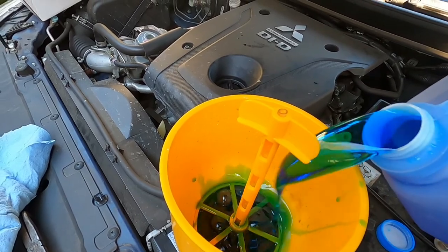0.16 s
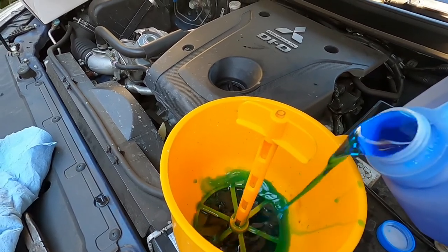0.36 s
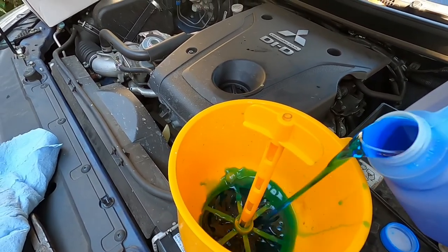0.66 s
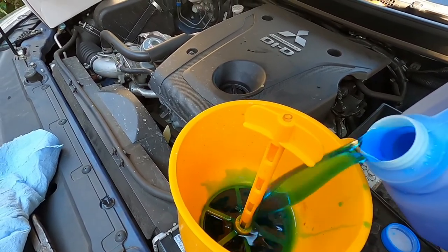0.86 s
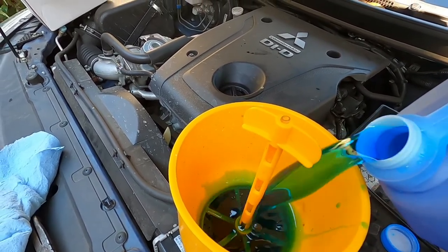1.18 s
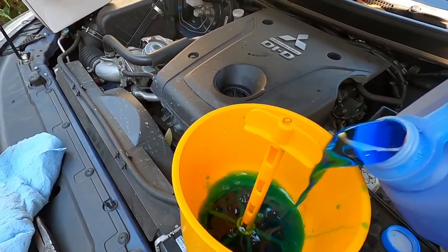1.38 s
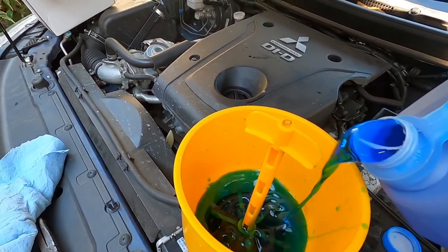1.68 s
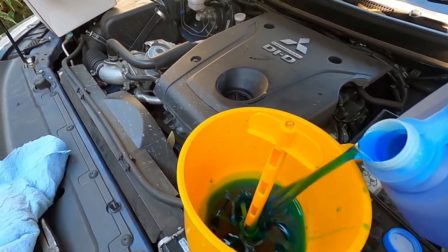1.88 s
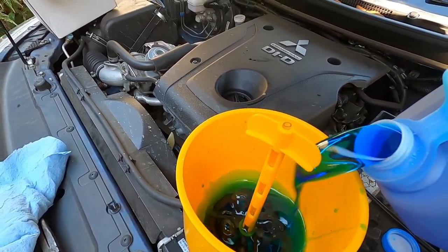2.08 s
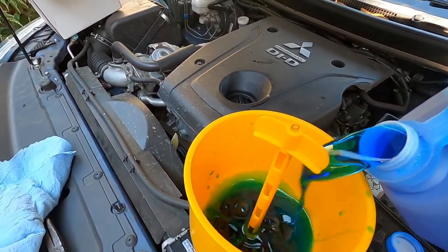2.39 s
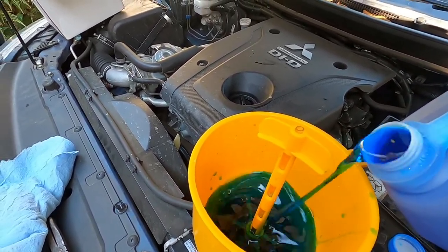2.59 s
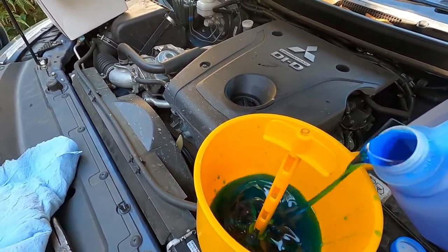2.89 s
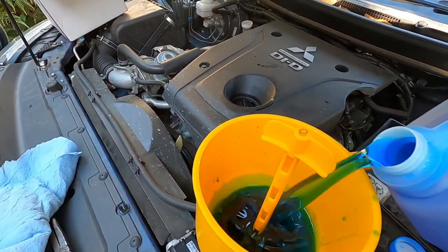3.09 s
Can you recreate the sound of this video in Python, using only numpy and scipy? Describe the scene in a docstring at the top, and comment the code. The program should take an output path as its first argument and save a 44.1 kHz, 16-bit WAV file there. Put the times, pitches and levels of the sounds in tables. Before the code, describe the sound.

Coolant glugs from a plastic jug into a part-filled funnel in quick, bubbly surges.

```python
"""Coolant glugs from a plastic jug into a part-filled plastic funnel, about three surges a second.
Each surge splashes as swarms of tiny bubbles and a noise wash; larger trapped bubbles ring with moving pitch.
Bursts crack and spray, and large air pockets plop and climb in pitch; the funnel's hollow colours all of these.
A low rumble, ticking droplets and echoes join them, over a faint hiss and a thin steady whine."""
import sys
import numpy as np
from scipy import signal
from scipy.fft import rfft, irfft, next_fast_len
from scipy.io import wavfile

SR = 44100
rng = np.random.default_rng(int(sys.argv[2]) if len(sys.argv) > 2 else 0)


def pcm_store(signal):
    """Save signal as 16-bit PCM."""
    levels = np.round(np.clip(np.atleast_2d(signal), -1, 1) * 32767)
    wavfile.write(sys.argv[1], SR, levels.astype(np.int16).T)


N = 143325
TIME = np.arange(N) / SR


def from_db(db):
    """Turn decibels into an amplitude factor."""
    return 10 ** (np.asarray(db) / 20)


def rms_one(x):
    """Scale a sound to unit average power."""
    return x / np.sqrt(np.mean(x ** 2) + 1e-20)


def at_hz(points, hz, axis=1):
    """Read a table column between its points, along a logarithmic pitch axis."""
    points = np.array(points)
    return np.interp(np.log(np.maximum(hz, 1)), np.log(points[:, 0]), points[:, axis])


def coloured(x, spectrum):
    """Make some pitches of a sound stronger and others weaker, along a smooth curve."""
    size = next_fast_len(x.shape[-1])
    gain = from_db(at_hz(spectrum, np.fft.rfftfreq(size, 1 / SR)))
    return irfft(rfft(x, size) * gain, size)[..., :x.shape[-1]]


def noise(spectrum):
    """Make coloured noise of unit power."""
    return rms_one(coloured(rng.standard_normal(N), spectrum))


def add(track, s, sound):
    """Mix a sound into a track at a time in seconds."""
    start = int(np.clip(s * SR, 0, N - 1))
    track[start:start + len(sound)] += sound[:N - start]


# Faint air noise behind the pour: (frequency [Hz], relative level [dB per Hz])
AIR = [(25, 8), (110, 9), (310, -2), (540, -11), (800, -11), (1450, -4), (2900, -8), (4200, -10.5),
       (7600, -18.5), (9500, -35), (13000, -35), (16000, -63)]
AIR_DB, AIR_SIDE_DB = -56, -3.5   # side: the part with opposite sign left and right, relative to the rest
WHINE_HZ, WHINE_DB = 5095, -61.5


def background():
    """Quiet outdoor air is coloured stereo noise; the thin whine is one steady sine."""
    side = from_db(AIR_SIDE_DB) * noise(AIR) * np.array([[1], [-1]])
    air = noise(AIR) + side
    whine = np.sin(2 * np.pi * WHINE_HZ * TIME)
    return from_db(AIR_DB) * air + from_db(WHINE_DB) * whine


# Surges hitting the pool:
# (peak time [s], splash level [dB], rise scale [s], fall scale [s], rumble level [dB])
SURGES = [(0.136, -29.5, 0.029, 0.042, -41), (0.451, -31, 0.043, 0.052, -42),
          (0.785, -31, 0.053, 0.041, -43), (1.101, -37, 0.052, 0.065, -40),
          (1.457, -34, 0.057, 0.043, -38.5), (1.767, -30, 0.043, 0.032, -39),
          (2.107, -36, 0.053, 0.042, -45.5), (2.469, -33, 0.066, 0.024, -47),
          (2.726, -40.5, 0.065, 0.073, -53.5), (3.057, -28, 0.016, 0.022, -45.5)]
TRICKLE_DB = -59.5   # the thin stream between surges
GLUG_SPLASH_DB, GLUG_SPLASH_S = -12, 0.0095   # small bubbles shed as a pocket surfaces


def flow():
    """The splash strength adds a steady trickle, the surges and a burst from each surfacing air pocket."""
    strength = from_db(TRICKLE_DB)
    for s, db, rise, fall, _ in SURGES:
        distance = np.abs((TIME - s) / np.where(TIME < s, rise, fall))
        strength = strength + from_db(db) * np.exp(-distance ** 1.71 / 1.17)
    for s, _, _, _, db, swell in GLUGS:
        shed = np.exp(-np.abs(TIME - s - swell) / GLUG_SPLASH_S)
        strength = strength + from_db(db + GLUG_SPLASH_DB) * shed
    return strength


BUBBLE_ONSET = 0.47   # share of full strength at the moment of trapping
BUBBLE_FADE = 1.35   # above 1, the fade starts gently and then steepens


def bubble(hz, rise, swell, decay):
    """Trapped air rings with gliding pitch (octaves/s), swells, then dies; a far climb weakens it too."""
    t = np.arange(int((swell + 6 * decay) * SR) + 2) / SR
    pitch = hz * 2 ** np.minimum(rise * t, 4)   # at most four octaves up
    growing = BUBBLE_ONSET + (1 - BUBBLE_ONSET) * t / swell
    dying = np.exp(-(np.maximum(t - swell, 0) / decay) ** BUBBLE_FADE)
    level = np.where(t < swell, growing, dying)
    surfacing = 1 / (1 + (pitch / min(hz * 4, hz + 2600)) ** 6)
    return level * surfacing * np.sin(2 * np.pi * np.cumsum(pitch) / SR)


# Strength of the tiny bubbles by pitch: (starting pitch [Hz], relative level [dB])
FIZZ = [(300, -16.5), (500, 0), (900, -6.5), (1500, 8.5), (3000, 5.5), (4500, 4.5), (7000, 1), (9500, -6),
        (14000, -6)]
FIZZ_PER_S, FIZZ_DB, FIZZ_SPREAD_DB = 1800, -3, 2.4   # spread: unevenness of bubble strength
FIZZ_CYCLES, FIZZ_RISE = 6, 0.16   # sets the decay; rise in octaves per decay time
# Smooth part of the splash: (frequency [Hz], relative level [dB per Hz])
WASH = [(100, 9), (300, 0.5), (1000, 5), (3000, -5.5), (6000, -9), (9000, -19.5), (16000, -34)]
WASH_DB = -16


def splash():
    """Swarms of tiny ringing bubbles and a smooth noise wash swell with the flow."""
    fizz = np.zeros(N)
    for when, pitch, size, sign in rng.random((int(FIZZ_PER_S * N / SR), 4)):
        hz = 350 * 40 ** (pitch ** 0.7)
        decay = FIZZ_CYCLES / (hz + 1500)
        db = at_hz(FIZZ, hz) + FIZZ_SPREAD_DB * min(-np.log(1 - size), 3.5)
        ring = bubble(hz, FIZZ_RISE / decay, 1 / hz, decay)
        add(fizz, when * N / SR, np.sign(sign - 0.5) * from_db(db) * ring)
    return flow() * (from_db(FIZZ_DB) * rms_one(fizz) + from_db(WASH_DB) * noise(WASH))


BURBLE_PER_S, BURBLE_HZ, BURBLE_DB, BURBLE_DECAY_S = 120, 561, -15, 0.0047
BURBLE_LINGER_S = 0.025   # how slowly the churning follows the flow


def burble():
    """Mid-sized churned bubbles ring near the funnel's lowest resonance and outlast each surge a little."""
    out = np.zeros(N)
    for when, pitch, size in rng.random((int(BURBLE_PER_S * N / SR), 3)):
        hz = BURBLE_HZ * 2 ** (pitch - 0.5)
        add(out, when * N / SR, size * bubble(hz, 12.5, 1 / BURBLE_HZ, BURBLE_DECAY_S))
    keep = np.exp(-1 / (BURBLE_LINGER_S * SR))
    churning = signal.lfilter([1 - keep], [1, -keep], flow())
    return from_db(BURBLE_DB) * rms_one(out) * churning


# Low shaking of the funnel: (frequency [Hz], relative level [dB per Hz])
RUMBLE = [(20, -14), (60, -6), (86, 7), (100, -3), (125, -4), (165, -14), (300, -19), (700, -60)]
RUMBLE_LAG_S, RUMBLE_WIDTH_S = 0.018, 0.037


def rumble():
    """The weight of each surge shakes the funnel: low noise swells just after the splash peak."""
    strength = np.zeros(N)
    for s, _, _, _, db in SURGES:
        distance = (TIME - s - RUMBLE_LAG_S) / RUMBLE_WIDTH_S
        strength += from_db(db) * np.exp(-0.5 * distance ** 2)
    return noise(RUMBLE) * strength


SPAT_DECAY_S = 0.0009


def spat(hz):
    """A drop ticks on plastic: a dying noise burst through a resonance, its grain differing left and right."""
    t = TIME[:SR // 100]
    burst = rng.standard_normal((2, len(t))) * np.exp(-t / SPAT_DECAY_S)
    tick = signal.lfilter(*signal.iirpeak(hz, 2, fs=SR), burst)
    return tick / np.abs(tick).max()


# Strong drops that hit the bare plastic: (time [s], pitch [Hz], level [dB])
SPATS = [(0.078, 10000, -35), (0.324, 11000, -35), (0.467, 12500, -35), (0.782, 12500, -33),
         (0.881, 9000, -31), (1.33, 11000, -36), (2.718, 13000, -33)]
MIST_PER_S, MIST_DB, MIST_SPREAD_DB = 130, -57, 8   # spread: unevenness of droplet strength
MIST_FOLLOWS = 1.05   # power of the flow that shapes the fine droplets


def mist():
    """Droplets tick on the funnel wall: many uneven fine ones follow the flow, plus a few strong ones."""
    fine, strong = np.zeros((2, N)), np.zeros((2, N))
    for when, pitch, size in rng.random((int(MIST_PER_S * N / SR), 3)):
        level = from_db(MIST_SPREAD_DB * min(-np.log(1 - size), 3))
        for channel, sound in zip(fine, spat(4500 * 2.8 ** pitch)):
            add(channel, when * N / SR, level * sound)
    for s, hz, db in SPATS:
        for channel, sound in zip(strong, spat(hz)):
            add(channel, s, from_db(db) * sound)
    return from_db(MIST_DB) * rms_one(fine * flow() ** MIST_FOLLOWS) + strong


WOBBLE_DB, WOBBLE_HZ = 3, 96   # typical swing in strength; upper limit of its speed


def wobble():
    """Large bubbles deform restlessly; slow noise of unit power stands for this."""
    slow = signal.butter(2, WOBBLE_HZ, fs=SR, output="sos")
    return rms_one(signal.sosfilt(slow, rng.standard_normal(N)))


# Distinct trapped air bubbles: (time [s], starting pitch [Hz], rise [octaves/s],
# relative level [dB], swell [s], decay [s])
BUBBLES = [(0.0159, 286, 13, -24, 0.0001, 0.0035), (0.0365, 2080, 81, -35.5, 0.011, 0.00094),
           (0.052, 2920, 59, -30, 0.0032, 0.0045), (0.0528, 2207, -20, -26.5, 0.0045, 0.0011),
           (0.0665, 2000, 92, -26, 0.006, 0.0022), (0.0815, 1358, 4.5, -31.5, 0.00057, 0.018),
           (0.1184, 428, 7.5, -15, 0.00073, 0.01), (0.1181, 2020, 18, -29, 0.0012, 0.0027),
           (0.1724, 2290, 5, -26, 0.0017, 0.002), (0.217, 489, 45.5, -29, 0.0019, 0.027),
           (0.246, 1970, 31, -20.5, 0.00073, 0.00051), (0.3188, 3100, 33, -40.5, 0.0012, 0.0019),
           (0.3795, 3150, 6, -34.5, 0.0023, 0.00081), (0.3945, 2630, 127, -24.5, 0.0036, 0.0011),
           (0.4082, 1470, 13, -25.5, 0.00082, 0.0032), (0.495, 552, 6, -35.5, 0.00071, 0.01),
           (0.523, 3160, 45, -27, 0.0019, 0.00042), (0.5758, 1990, 72, -29.5, 0.00079, 0.00062),
           (0.5816, 3320, 110, -21.5, 0.00074, 0.00017), (0.5942, 2130, 62, -42, 0.0025, 0.0084),
           (0.6775, 1275, 15, -39.5, 0.00052, 0.068), (0.6926, 637, -3, -35.5, 0.0075, 0.0031),
           (0.693, 3170, 107, -29, 0.001, 0.0045), (0.7064, 2880, 69, -32.5, 0.0026, 0.0065),
           (0.795, 518, 5, -36, 0.0024, 0.01), (0.7946, 1480, 24, -30.5, 0.0017, 0.0033),
           (0.803, 2174, 81, -22, 0.0049, 0.00056), (0.8195, 480, -2, -31.5, 0.0025, 0.0055),
           (0.9859, 1215, 91.5, -43.5, 0.0011, 0.011), (1.0573, 1983, 28, -33, 0.00028, 0.055),
           (1.0694, 2420, 51, -20.5, 0.0026, 0.0017), (1.0809, 3380, 22, -25.5, 0.004, 0.0004),
           (1.1036, 1250, 87, -30.5, 0.0016, 0.0035), (1.103, 202, 11.5, -32, 0.0074, 0.026),
           (1.129, 590, -2, -35, 0.0078, 0.0052), (1.174, 584, 16, -19.5, 0.00065, 0.0015),
           (1.181, 515, 26.5, -29, 0.0094, 0.0081), (1.3099, 2410, 45, -50.5, 0.0012, 0.0096),
           (1.3704, 2640, 27, -37.5, 0.005, 0.0014), (1.3933, 2400, 107, -23, 0.00021, 0.0007),
           (1.4265, 1980, 81, -24.5, 0.00051, 0.0042), (1.481, 518, 5, -40.5, 0.002, 0.012),
           (1.5336, 2950, 21, -31, 0.0019, 0.00067), (1.654, 1092, 68.5, -28, 0.0224, 0.0006),
           (1.6527, 1980, 71, -33.5, 0.0013, 0.009), (1.6896, 1040, -9, -34, 0.0021, 0.0071),
           (1.756, 322, 2.5, -19.5, 0.0012, 0.013), (1.7575, 674, 10, -17, 0.00079, 0.0022),
           (1.758, 990, 6, -24.5, 0.0013, 0.0055), (1.7791, 2450, 40, -21, 0.0012, 0.0025),
           (1.803, 396, 38, -37.5, 0.01, 0.0059), (1.83, 477, 6, -39.5, 0.0042, 0.004),
           (1.981, 1680, 74, -54, 0.014, 0.0072), (2.0108, 2338, 70.5, -26.5, 0.00036, 0.01),
           (2.018, 2190, 77, -28, 0.0005, 0.0052), (2.022, 1720, 8, -20, 0.0011, 0.0011),
           (2.052, 1185, 17, -28.5, 0.00056, 0.0095), (2.075, 2977, 16, -34.5, 0.0012, 0.011),
           (2.1222, 512, 21, -38, 0.0018, 0.034), (2.155, 1900, 40, -29, 0.001, 0.008),
           (2.3178, 1060, 12, -24.5, 0.00013, 0.0063), (2.352, 1736, 28, -22, 0.00032, 0.0037),
           (2.453, 2450, 64, -24.5, 0.0026, 0.00036), (2.461, 608, 11.5, -26.5, 0.00072, 0.0088),
           (2.467, 1514, -2, -25, 0.00027, 0.005), (2.4783, 2370, 11, -23.5, 0.0024, 0.0012),
           (2.674, 2000, 30, -30, 0.00077, 0.009), (2.743, 636, 10, -29, 0.0025, 0.012),
           (2.7665, 2620, 211, -33, 0.0013, 0.00087), (2.8017, 1247, 66.5, -32, 0.0053, 0.013),
           (2.856, 613, 33, -27, 0.0017, 0.0027), (2.933, 595, 2, -23.5, 0.0097, 0.0049),
           (2.9324, 1185, 29.5, -31, 0.0051, 0.0044), (3.0008, 2070, 2, -20, 0.0029, 0.0011),
           (3.0393, 1667, -14, -22.5, 0.0022, 0.0029), (3.0496, 560, 12, -15, 0.0017, 0.00042),
           (3.0561, 2980, 85, -26.5, 0.0014, 0.0065), (3.0599, 1570, -2, -24, 0.0027, 0.0032),
           (3.067, 622, -4.5, -30, 0.0012, 0.011), (3.071, 2346, 123.5, -25.5, 0.0065, 0.00046),
           (3.1078, 1716, 28, -25.5, 0.0017, 0.0091), (3.119, 560, 37, -41, 0.005, 0.022),
           (3.2225, 2180, 5, -27.5, 0.00044, 0.0022)]
BUBBLE_DB = 1.5   # added to every level


def gurgles():
    """Distinct bubbles ring with gliding pitch and waver in strength as they deform."""
    out = np.zeros(N)
    for s, hz, rise, db, swell, decay in BUBBLES:
        add(out, s, from_db(db + BUBBLE_DB) * bubble(hz, rise, swell, decay))
    return out * from_db(WOBBLE_DB * wobble())


# Bubbles bursting and drops slapping: (time [s], relative spray level [dB], relative body level [dB])
POPS = [(0.0549, -28.5, -28), (0.078, -28, -20.5), (0.1343, -40, -20.5), (0.2132, -21.5, -23.5),
        (0.3241, -50, -35), (0.392, -27, -27.5), (0.409, -19, -24.5), (0.4543, -23, -48),
        (0.4824, -26.5, -51), (0.5626, -28, -28), (0.6938, -30.5, -29), (0.8663, -22.5, -29.5),
        (1.0224, -35.5, -57), (1.0807, -27, -52), (1.1323, -23, -58), (1.167, -32, -36),
        (1.1907, -26.5, -31.5), (1.33, -34, -45.5), (1.398, -21.5, -50), (1.424, -26.5, -46),
        (1.4605, -27.5, -29), (1.5314, -22.5, -37.5), (1.691, -29.5, -32), (1.742, -29.5, -22),
        (1.7798, -16.5, -24.5), (1.829, -29.5, -26), (2.0139, -18, -34), (2.0704, -20.5, -27.5),
        (2.1592, -20, -25.5), (2.3185, -64, -25.5), (2.4039, -36.5, -39), (2.432, -21.5, -45),
        (2.4947, -26, -32), (2.6749, -36, -43), (2.7104, -23, -59), (2.798, -21.5, -22),
        (2.9713, -36, -24.5), (3.042, -26.5, -23), (3.0597, -23, -22), (3.111, -23.5, -28),
        (3.219, -37.5, -37)]
POP_BODY_DB, POP_SPRAY_DB = -2, -4.5   # added to every level
POP_SCALE_S = 0.0018   # sets the length of each crack


def pops():
    """Each burst is a brief, grainy noise crack, split into a dull body and a bright spray."""
    out, t = np.zeros(N), TIME[:SR // 40]
    body = signal.butter(2, [300, 2550], "band", fs=SR, output="sos")
    spray = signal.butter(2, [3800, 6980], "band", fs=SR, output="sos")
    for s, spray_db, body_db in POPS:
        grain = rng.standard_normal((2, len(t))) ** 3   # cubing makes a few grains stand out
        crack = grain * t * np.exp(-1.6 * t / POP_SCALE_S)
        levels = (body_db + POP_BODY_DB, spray_db + POP_SPRAY_DB)
        for band, burst, db in zip((body, spray), crack, levels):
            sound = signal.sosfilt(band, burst)
            strength = np.sqrt(np.sum(sound ** 2) / (POP_SCALE_S * SR))
            add(out, s, from_db(db) * sound / strength)
    return out


# Large air pockets that rise through the pool: (time [s], starting pitch [Hz], rise [octaves/s],
# starting level [dB], level at the end of the swell [dB], swell [s])
GLUGS = [(0.385, 220.8, 39.7, -26, -29, 0.039), (2.297, 190.9, 27.7, -29, -19.5, 0.06),
         (2.916, 198.4, 27.2, -25.5, -18.5, 0.054)]
GLUG_DECAY_S, GLUG_TAIL_DB, GLUG_TAIL_S = 0.012, -9, 0.023
GLUG_WAVER = 0.04   # typical share by which the pitch strays
PLOP_DB, PLOP_S = 2.5, 0.00062   # relative to the starting level; time of the pulse's peak


def glugs():
    """A pocket closes with one low pulse, climbs unsteadily in pitch, then collapses to a thin tail."""
    out, t = np.zeros(N), TIME[:SR // 8]
    for s, hz, rise, start_db, peak_db, swell in GLUGS:
        pitch = hz * 2 ** (rise * t) * (1 + GLUG_WAVER * wobble()[-len(t):])
        after = np.maximum(t - swell, 0)
        growing = from_db(np.interp(t, [0, swell], [start_db, peak_db]))
        tail = from_db(GLUG_TAIL_DB) * np.exp(-after / GLUG_TAIL_S)
        level = growing * np.maximum(np.exp(-after / GLUG_DECAY_S), tail)
        ending = 1 - (t / t[-1]) ** 10   # reaches silence without a click
        plop = from_db(start_db + PLOP_DB) * t / PLOP_S * np.exp(-t / PLOP_S)
        add(out, s, level * np.sin(2 * np.pi * np.cumsum(pitch) / SR) * ending + plop)
    return out


# Resonances of the funnel's hollow: (frequency [Hz], sharpness Q, gain [dB])
FUNNEL = [(516, 3.0, 14.5), (813, 7.5, -7), (1431.5, 30, 6), (2288, 18, 5), (2886, 5.04, 9),
          (5450, 10.3, 8), (7830, 11.9, 8), (12300, 4, -1)]


def funnel(x):
    """The hollow above the pool strengthens or weakens sound around its resonances."""
    for hz, q, db in FUNNEL:
        w, gain = 2 * np.pi * hz / SR, from_db(db / 2)
        width, centre = np.sin(w) / (2 * q), -2 * np.cos(w)
        above = [1 + width * gain, centre, 1 - width * gain]
        below = [1 + width / gain, centre, 1 - width / gain]
        x = signal.lfilter(above, below, x)
    return x


BAY_T60_S, BAY_DB, BAY_DELAY_S = 0.052, -10.5, 0.001857   # T60: time to die away by 60 dB
YARD_T60_S, YARD_DB = 0.21, -33.5   # faint longer echo of the surroundings


def reflections(x, colour):
    """A short scatter from the engine bay and a faint longer echo: dying noise smears the sound."""
    t = TIME[:SR // 2]
    tail = 0
    for t60, db in ((BAY_T60_S, BAY_DB), (YARD_T60_S, YARD_DB)):
        dying = from_db(-60 * t / t60) * (t > BAY_DELAY_S)
        tail = tail + from_db(db) * dying / np.sqrt(np.sum(dying ** 2))
    echo = tail * coloured(rng.standard_normal(len(t)), colour)
    return signal.fftconvolve(x, echo)[:N]


# The two microphone ports: (frequency [Hz], left gain [dB], right gain [dB], left phase lag [rad])
PORTS = [(61, -1, -0.5, 0.5), (483, -6.5, -6, 0), (1260, 0.5, 1.5, 0.41), (2050, 3, 2.5, 0.74),
         (3510, 6, 0.2, 1.52), (3953, 10, 12.5, 3.5), (4595, 1, 2.5, 1.5), (5840, -6, 0, 4),
         (7260, -19, -2, 5), (8760, -24.5, 0, -0.3), (9600, -11, -4.5, 0.5), (12000, -12, -4, 5),
         (16000, -18, -21, -1)]


def ports(pair):
    """Each microphone port colours the sound its own way; the left one also shifts its phase."""
    size = next_fast_len(N + SR // 10)
    hz = np.fft.rfftfreq(size, 1 / SR)
    left = from_db(at_hz(PORTS, hz, axis=1)) * np.exp(-1j * at_hz(PORTS, hz, axis=3))
    right = from_db(at_hz(PORTS, hz, axis=2))
    return irfft(rfft(pair, size) * np.array([left, right]), size)[:, :N]


# Colour of the reflections that reach both ports alike: (frequency [Hz], relative level [dB])
BAY = [(100, 11), (600, -0.5), (1500, 1), (3000, -2.5), (7000, -17.5)]
# Reflections that differ at each port: (frequency [Hz], relative left level [dB], relative right level [dB])
SCATTER = [(686, -12.5, -8), (1480, -9, -4), (2940, -8, 1), (4100, 2.5, -2.5), (8350, -15, -2.5),
           (13000, -6.5, 3)]


def scene():
    """The pour is heard through the funnel from close above, with its rumble, droplets and reflections."""
    pour = funnel(gurgles() + glugs() + pops() + splash() + burble()) + rumble()
    scatter = np.array([reflections(pour, np.array(SCATTER)[:, [0, side]]) for side in (1, 2)])
    return ports(pour + reflections(pour, BAY) + mist()) + scatter + background()


def record(dry):
    """A steep filter removes the very top: at least 60 dB down from 16600 Hz upward."""
    return signal.sosfilt(signal.cheby2(12, 60, 16600, fs=SR, output="sos"), dry)


dry = scene()
out = record(dry)
pcm_store(out)
```